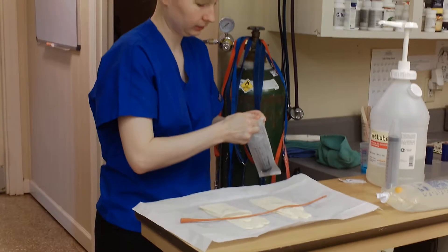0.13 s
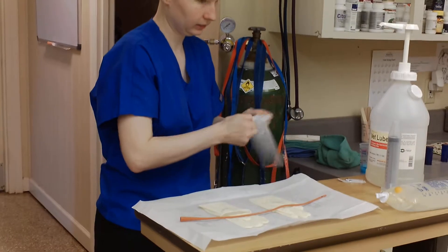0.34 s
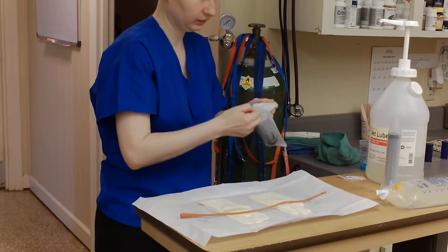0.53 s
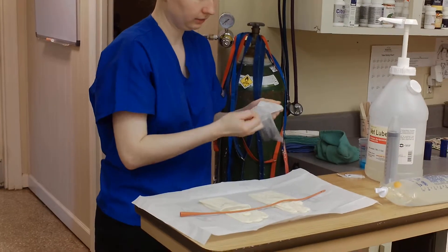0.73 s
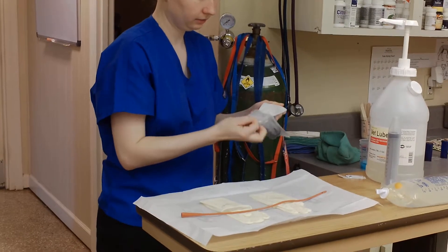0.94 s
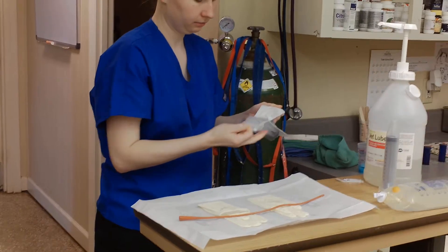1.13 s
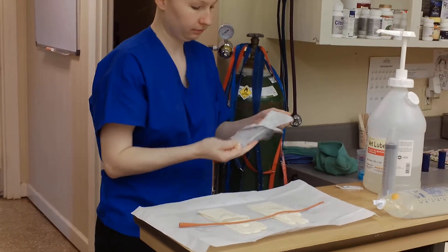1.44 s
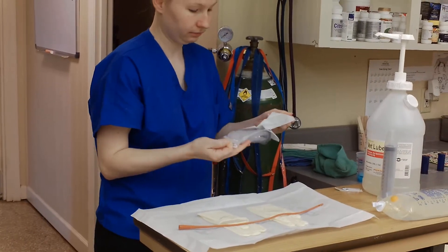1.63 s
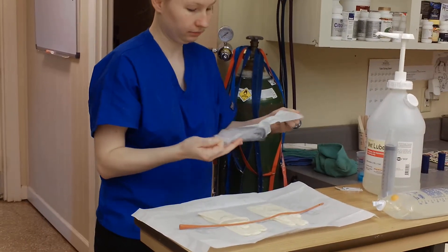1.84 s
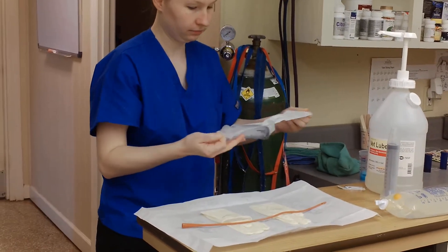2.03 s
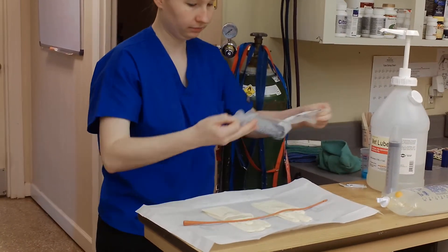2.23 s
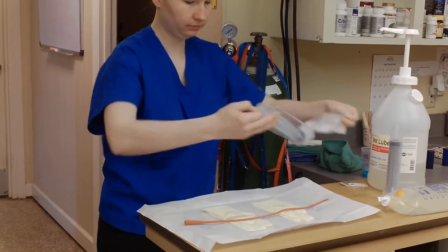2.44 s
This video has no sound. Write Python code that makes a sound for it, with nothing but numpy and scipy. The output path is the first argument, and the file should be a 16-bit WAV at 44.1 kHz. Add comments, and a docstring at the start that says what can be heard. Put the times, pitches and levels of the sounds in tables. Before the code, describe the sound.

A thin plastic and paper packet crinkles and crackles in short bursts as hands peel it open

```python
"""A plastic and paper pouch is peeled open by hand over a table in a small, hard-walled room.
Each pull is a swarm of tiny clicks, the buckles in the film, that also ring its small facets.
Single creases snap and ring briefly, fingers rub softly, and the slack sheet flaps with dull, damped swings.
The room adds echoes and a short tail; ventilation noise, low drones and a faint electrical whine lie below."""
import sys
import numpy as np
from scipy import signal
from scipy.fft import rfft, irfft, next_fast_len
from scipy.io import wavfile
from scipy.ndimage import uniform_filter1d

SR = 44100
rng = np.random.default_rng(int(sys.argv[2]) if len(sys.argv) > 2 else 0)


def store_pcm(level_fs):
    """Save levels as 16-bit WAV."""
    pcm = np.round(np.clip(level_fs, -1, 1) * 32767).astype(np.int16)
    wavfile.write(sys.argv[1], SR, np.atleast_2d(pcm).T)


N = 114660
TIME = np.arange(N) / SR   # seconds

# colour that the film gives to buckles and cracks: (frequency [Hz], relative level [dB])
FILM_COLOUR = [(60, -63), (200, -21.5), (380, -20.5), (560, -13), (950, -14.5), (1200, -21), (1480, -7.5),
               (1800, -8.5), (2250, 1), (2750, 1), (3150, -2.5), (3450, -10.5), (4100, -11), (5000, -25.5),
               (5700, -47.5), (7000, -34.5), (8500, -33.5), (10300, -32.5), (12000, -42), (15000, -35),
               (16000, -52)]

BUCKLES_PER_S, SIZE_SPREAD_DB, EVEN_OVER_S = 1100, 5, 0.018
FACET_LOW_HZ, FACET_HIGH_HZ, FACET_CYCLES, FACET_DB = 1944, 3260, 45, -4
BASS_HZ, TREBLE_HZ = 1760, 3400   # where the film sound is split into three bands
HANDLING_DB = -52.5   # steady light rustle under the pulls
SNAP_T60_S, SNAP_RING_DB, SNAP_CRACK_DB = 0.01, 8.98, 24
CRACK_LOW_CUT_HZ = 620
CRACK_TOP_HZ, CRACK_TOP_DB = 8500, 5.5   # extra sparkle of a crisp crack
FLAP_T60_S, FLAP_PUSH_S = 0.014, 0.0015
THUD_HZ, THUD_T60_S = 124, 0.013
RUB_T60_S = 0.019
TURN_S = 0.008   # time in which the film turns to face another way
ECHO_SHIFT = 0.3077   # largest random change of an echo delay, as a fraction
DIRECT_DB, ROOM_DB, FLAP_ROOM_DB, ROOM_BUILD_S = -5.5, -3.5, -6, 0.0017
LOW_CUT_HZ = 113
AIR_DB, AIR_WAVER_DB, DRONE_T60_S = -47, 0.8, 0.18
WHINE_HZ, WHINE_DB, WHINE_WANDER_HZ = 13418, -67, 6
CUTOFF_HZ = 15900


def from_db(db):
    """Turn decibels into gain."""
    return 10 ** (np.asarray(db) / 20)


def rms_one(x):
    """Scale to unit power."""
    return x / np.sqrt(np.mean(x ** 2) + 1e-20)


def at_hz(points, hz):
    """Read a table on a log-frequency axis."""
    table_hz, value = np.transpose(points)
    return np.interp(np.log(np.maximum(hz, 1)), np.log(table_hz), value)


def colour(x, spectrum):
    """Shape the spectrum with a filter of unit power gain that never acts ahead of its input."""
    size = 2 * next_fast_len(N)
    gain = rms_one(from_db(at_hz(spectrum, np.fft.rfftfreq(size, 1 / SR))))
    # folding the cepstrum gives the minimum-phase version of this gain
    cepstrum = irfft(np.log(gain))
    cepstrum[1:size // 2] *= 2
    cepstrum[size // 2 + 1:] = 0
    return irfft(rfft(x, size) * np.exp(rfft(cepstrum)))[:N]


def butter(x, hz, kind, order=2):
    """Apply a Butterworth filter."""
    return signal.sosfilt(signal.butter(order, hz, kind, fs=SR, output="sos"), x + 1e-18)


def both_ways(x, hz, kind):
    """Filter forwards and backwards, so that the bands stay aligned in time."""
    backwards = butter(x, hz, kind)[::-1]
    return butter(backwards, hz, kind)[::-1]


def ring(clicks, hz, t60):
    """Let each unit click start a decaying sine of height 1, as in a struck resonance."""
    r = np.exp(-np.log(1000) / (t60 * SR))
    w = 2 * np.pi * hz / SR
    return signal.lfilter([0, np.sin(w)], [1, -2 * r * np.cos(w), r * r], clicks + 1e-18)


def click(s):
    """Make one unit click at a given second."""
    return signal.unit_impulse(N, int(np.clip(s * SR, 0, N - 1)))


def crumples():
    """Each pull makes the stream of buckles swell and let go, with its own share of treble and bass."""
    # (time of the peak [s], level [dB], rise [s], fall [s], treble against middle [dB], bass against middle [dB])
    pulls = [(0.111, -33.5, 0.021, 0.017, -21, 4), (0.204, -18.5, 0.014, 0.011, 0, 6.5),
             (0.229, -13.5, 0.0071, 0.011, 3.5, 0), (0.25, -18, 0.013, 0.0085, 6, 5),
             (0.305, -32, .03, 0.068, 2.5, 9.5), (0.445, -27.5, 0.0097, 0.01, -3, 10.5),
             (0.512, -33, 0.023, 0.034, -1, -4), (0.573, -30.5, 0.03, 0.014, 5, 8),
             (0.603, -21, 0.011, 0.011, -1, -2.5), (0.631, -24.5, 0.01, 0.02, -9, -4.5),
             (0.685, -32.5, 0.045, 0.0096, -1, 8), (0.801, -31, 0.043, 0.042, -6, -7.5),
             (0.871, -30, 0.0059, 0.018, 12, -6), (0.915, -36, .02, 0.014, 0, -13),
             (1.012, -32.5, 0.088, 0.038, -4.5, -8), (1.107, -25, 0.037, 0.028, 2, 8),
             (1.135, -34, 0.042, 0.026, 10.5, -6), (1.18, -39, 0.025, 0.083, 4, 8),
             (1.287, -28, 0.013, 0.036, -3, 6.5), (1.255, -36, 0.037, .02, 5.5, 10),
             (1.335, -21.5, 0.051, 0.017, 7.5, 2), (1.356, -22, 0.045, 0.069, -6, -25),
             (1.445, -27.5, 0.036, 0.024, -16, -14), (1.604, -24, 0.083, 0.037, 6, 4.5),
             (1.631, -21.5, 0.025, 0.04, 1, -1.5), (1.72, -37.5, .02, .07, -8, 0),
             (1.85, -36, 0.086, 0.018, 3, 3), (1.962, -37.5, 0.013, 0.012, -10, 4.5),
             (2.025, -41.5, 0.017, 0.035, -6, 6.5), (2.272, -33.5, 0.0048, 0.0072, 0, 12),
             (2.305, -32, 0.014, 0.032, 0, 3.5), (2.444, -41, 0.026, .04, 0.5, -8)]
    stream = buckles()
    bass = both_ways(stream, BASS_HZ, "low")
    treble = both_ways(stream, TREBLE_HZ, "high")
    middle = stream - bass - treble
    power = from_db(HANDLING_DB) ** 2
    for s, db, rise, fall, treble_db, bass_db in pulls:
        band_power = from_db([db + bass_db, db, db + treble_db]) ** 2
        power = power + np.outer(band_power, swell(s, rise, fall))
    return np.sum(np.sqrt(power) * [bass, middle, treble], axis=0)


def buckles():
    """Uneven random clicks of the film, each also ringing one small facet, evened to a steady power."""
    born = rng.random(N) < BUCKLES_PER_S / SR
    sizes = from_db(SIZE_SPREAD_DB * np.minimum(rng.exponential(1, N), 4))
    clicks = born * sizes * rng.choice([-1, 1], N)
    pitches = np.geomspace(FACET_LOW_HZ, FACET_HIGH_HZ, 20)
    dealt = rng.integers(0, len(pitches), N)   # which facet a click rings
    facets = sum(ring(clicks * (dealt == k), hz, FACET_CYCLES / hz) for k, hz in enumerate(pitches))
    stream = colour(rms_one(clicks), FILM_COLOUR) + from_db(FACET_DB) * rms_one(facets)
    local_power = np.abs(uniform_filter1d(stream ** 2, int(EVEN_OVER_S * SR)))
    return stream / np.sqrt(local_power + 1e-3)


def swell(s, rise, fall):
    """Power of one pull: a steep build-up to its peak, then an exponential release."""
    before = np.maximum(s - TIME, 0) / rise
    after = np.maximum(TIME - s, 0) / fall
    return np.exp(-np.minimum(before ** 2 + 2 * before + 2 * after, 20))


def snaps():
    """A crease flips with a crack, crisp or dull, and a short ring at its own pitch."""
    # (time [s], relative level [dB], ring pitch [Hz], extra crack level [dB], top of the crack [Hz])
    creases = [(0.104, -25.5, 2130, -4, 2980), (0.226, -13, 2620, -3, 12000), (0.246, -15, 1520, -4, 5000),
               (0.252, -6, 2530, -16.5, 9100), (0.267, -11, 2750, -14, 6000), (0.273, -18, 2690, -27, 5000),
               (0.347, -19.5, 2710, -24, 4030), (0.44, -23.5, 1810, 0, 3200), (0.452, -25, 2240, -19, 3020),
               (0.497, -22.5, 2140, -32, 4000), (0.566, -38, 2560, -7, 12000),
               (0.624, -19.5, 2280, -8, 5000), (0.672, -27.5, 2650, -9, 4000),
               (0.789, -46, 2780, -3, 15000), (0.8656, -20.5, 1530, 2, 16000),
               (0.8691, -21, 2960, -7, 12000), (1.086, -19, 2460, -20, 8000), (1.094, -25, 2250, -8, 8000),
               (1.135, -19, 2440, -7, 8000), (1.177, -27, 2440, -17, 4000), (1.26, -28, 1620, -3, 5000),
               (1.279, -19.5, 2620, -13, 12000), (1.282, -21, 2700, -4, 9000),
               (1.327, -23.5, 2660, -6, 10000), (1.353, -19, 2470, -3.5, 11900),
               (1.581, -23.5, 2550, -1, 12000), (1.62, -23, 2960, -3, 14000), (1.843, -36, 2380, -5, 12000),
               (1.958, -33.5, 1930, -8, 4000), (2.272, -38, 3400, -7, 6000),
               (2.278, -27.5, 2700, -23, 5000), (2.297, -21.5, 2640, -0.5, 17000),
               (2.303, -26, 2680, -2, 16000), (2.322, -23, 2790, -25, 6000), (2.578, -24, 2600, -11, 5000),
               (2.586, -46, 2570, -14, 4000)]
    cracks, rings = np.zeros(N), np.zeros(N)
    for s, db, hz, crack_db, sharp_hz in creases:
        cracks += from_db(db + crack_db + SNAP_CRACK_DB) * butter(click(s), sharp_hz, "low")
        ringing = ring(click(s), hz, SNAP_T60_S)
        rings += from_db(db + SNAP_RING_DB) * butter(ringing, [hz * 0.88, hz * 1.187], "band")
    sparkle = from_db(CRACK_TOP_DB) * butter(cracks, CRACK_TOP_HZ, "high", order=4)
    cracks = butter(cracks, CRACK_LOW_CUT_HZ, "high") + sparkle
    return colour(cracks, FILM_COLOUR) + rings


def flaps():
    """A push on the slack sheet gives a hollow pop over a low thud."""
    # (time [s], level [dB], pop pitch [Hz], thud against the pop [dB])
    pushes = [(0.002, -38.5, 230, 6), (0.201, -26.5, 543, -25), (0.232, -29.5, 334, -6),
              (0.247, -19, 620, -18.5), (0.440, -20.5, 578, -7), (0.664, -28, 278, -3),
              (0.67, -21.5, 434, -8.5), (0.896, -31.5, 240, 0), (1.114, -32, 328, -13),
              (1.648, -32, 410, -15)]
    total = np.zeros(N)
    for s, db, hz, thud_db in pushes:
        thud = from_db(thud_db) * pop(s, THUD_HZ, THUD_T60_S)
        total += from_db(db) * (pop(s, hz, FLAP_T60_S) + thud)
    return total


def pop(s, hz, t60):
    """A damped swing that a soft push sets going."""
    age = np.maximum(TIME - s, 0)
    push = 1 - np.exp(-age / FLAP_PUSH_S)
    decay = np.exp(-np.minimum(np.log(1000) * age / t60, 20))
    return 2 * np.sin(2 * np.pi * hz * age) * push * decay


def rubs():
    """Fingers drag on the film: friction noise excites one broad, hollow resonance of the pouch."""
    # (time of the middle [s], level [dB], time from the middle to 1/e of the height [s], pitch [Hz])
    drags = [(0.206, -37.5, 0.014, 545), (0.83, -43.5, 0.041, 710)]
    total = np.zeros(N)
    for s, db, length, hz in drags:
        stroke = np.exp(-np.minimum(((TIME - s) / length) ** 2, 20))
        friction = ring(rng.standard_normal(N), hz, RUB_T60_S)
        total += from_db(db) * stroke * rms_one(butter(friction, hz / 2, "high"))
    return total


def moving_in_room(x, wet_db, count):
    """The film keeps changing shape, so its sound fades in turn between different paths into the room."""
    turn = TIME / TURN_S
    total = np.zeros(N)
    for k in range(count):
        distance = np.abs((turn - k + count / 2) % count - count / 2)   # turns away from path k
        share = np.cos(np.pi / 2 * np.minimum(distance, 1)) ** 2
        total += reflections(x * np.sqrt(share), wet_db)
    return total


def reflections(x, wet_db):
    """First echoes from table and walls, and a diffuse noise tail that dies band by band."""
    # first echoes: (delay before a random change [s], level against the tail [dB])
    first_echoes = [(.0033, -8.5), (.0065, -9.5), (.0098, -10)]
    # time for the tail to fall by 60 dB: (frequency [Hz], time [s])
    tail_t60 = [(150, .25), (700, 0.41), (2500, 0.38), (5000, 0.29), (12000, 0.35)]
    age = TIME[:N // 4]
    edges = np.geomspace(60, 18000, 10)   # band limits in Hz
    white = rng.standard_normal((2, len(age)))
    tail = np.zeros(len(age))
    for k, (lo, hi) in enumerate(zip(edges, edges[1:])):
        decay = np.exp(-np.log(1000) * age / at_hz(tail_t60, np.sqrt(lo * hi)))
        tail += butter(white[k % 2], [lo, hi], "band") * decay   # neighbouring bands use separate noise
    tail *= 1 - np.exp(-age / ROOM_BUILD_S)
    response = from_db(wet_db) * tail / np.linalg.norm(tail)
    for delay, db in first_echoes:
        shifted = delay * (1 + ECHO_SHIFT * rng.uniform(-1, 1))
        response[int(abs(shifted) * SR)] += from_db(wet_db + db)
    return signal.fftconvolve(x, response)[:N]


def background():
    """Ventilation noise with narrow drones, and a thin, slightly unsteady electrical whine."""
    # ventilation and hiss: (frequency [Hz], relative level [dB])
    air_colour = [(25, -9.5), (60, -9), (130, -8), (220, -6), (380, -3.5), (500, -3.5), (620, -5.5),
                  (780, -3.5), (900, -6), (1250, -7), (2500, -0.5), (3600, -16.5), (5600, -35),
                  (8300, -34.5), (10500, -31), (15500, -39)]
    # narrow drones of the ventilation: (frequency [Hz], level [dB])
    drone_tones = [(375, -57.5), (484, -62.5), (724, -57), (772, -58.5)]
    waver, wander = (rms_one(butter(rng.standard_normal(N), 15, "low")) for _ in range(2))
    air = from_db(AIR_DB + AIR_WAVER_DB * waver) * colour(rng.standard_normal(N), air_colour)
    drones = np.zeros(N)
    for hz, db in drone_tones:
        settled = ring(rng.standard_normal(N + SR), hz, DRONE_T60_S)[SR:]   # skip the build-up
        drones += from_db(db) * rms_one(settled)
    cycles = np.cumsum(WHINE_HZ + WHINE_WANDER_HZ * wander) / SR
    whine = np.sqrt(2) * np.sin(2 * np.pi * cycles)
    return air + drones + from_db(WHINE_DB) * whine


def scene():
    """The pouch, heard directly and through the room, over the background."""
    film = crumples() + snaps()
    sheet = flaps() + rubs()
    near = from_db(DIRECT_DB) * film + sheet
    room = moving_in_room(film, wet_db=ROOM_DB, count=6) + reflections(sheet, wet_db=FLAP_ROOM_DB)
    return (butter(near + room, LOW_CUT_HZ, "high") + background())[None]


def record(dry):
    """The microphone has two dips in the treble, and a steep filter cuts the very top."""
    # dips in the microphone's response: (frequency [Hz], width [Hz])
    dips = [(6010, 960), (8030, 3300)]
    for hz, width_hz in dips:
        dry = signal.lfilter(*signal.iirnotch(hz, hz / width_hz, fs=SR), dry)
    return signal.sosfilt(signal.ellip(10, 0.1, 70, CUTOFF_HZ, fs=SR, output="sos"), dry)


dry = scene()
out = record(dry)
store_pcm(out)
```